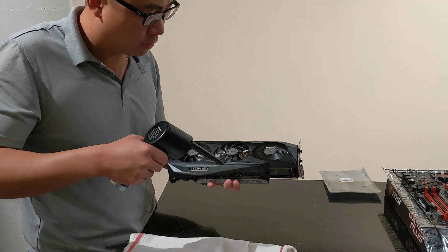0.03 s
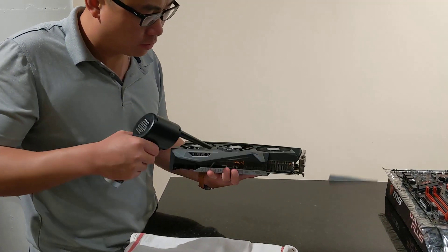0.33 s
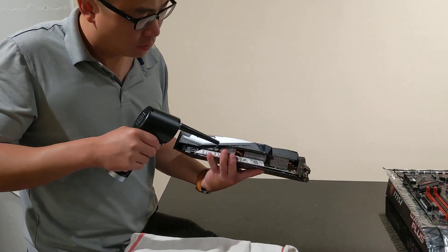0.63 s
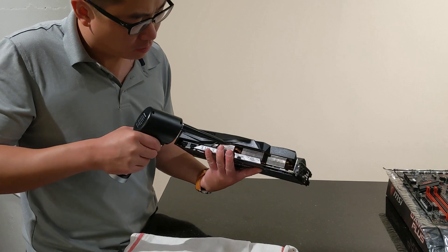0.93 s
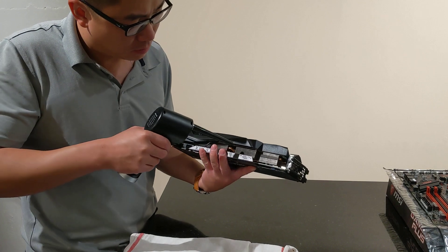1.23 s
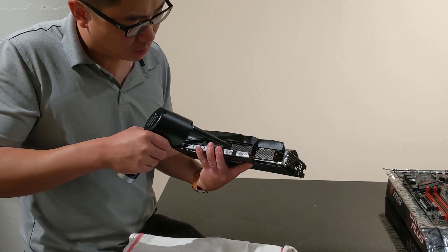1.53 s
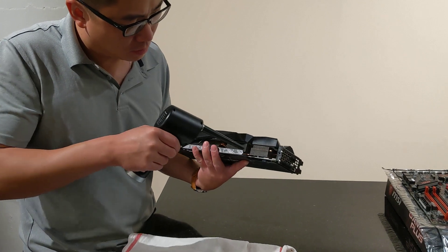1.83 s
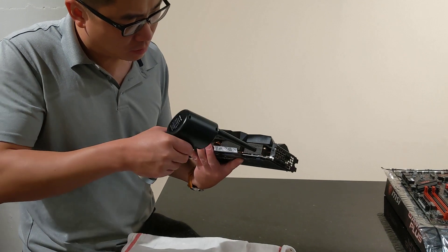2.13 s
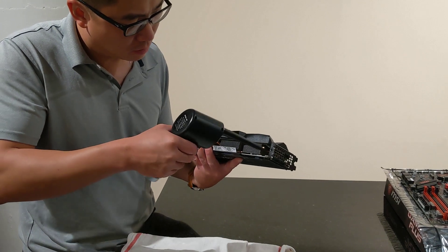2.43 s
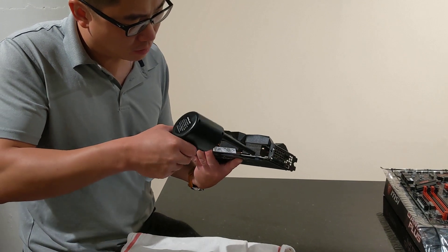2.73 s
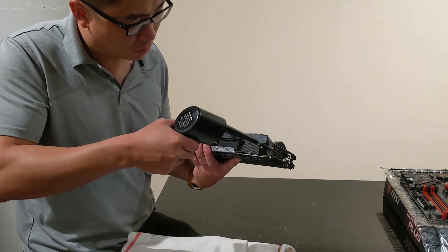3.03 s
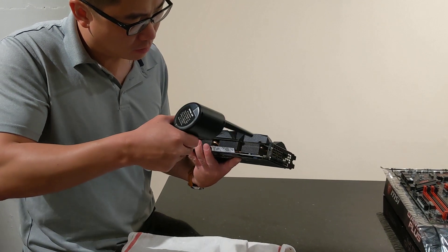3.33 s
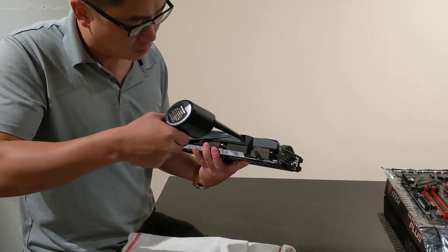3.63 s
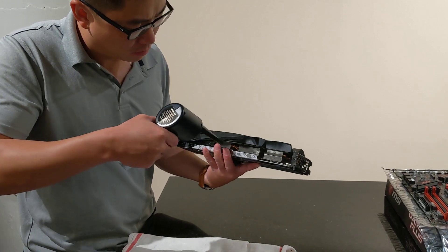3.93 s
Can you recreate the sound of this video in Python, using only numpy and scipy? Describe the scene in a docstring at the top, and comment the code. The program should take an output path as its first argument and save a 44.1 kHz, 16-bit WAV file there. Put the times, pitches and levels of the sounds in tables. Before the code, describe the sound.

An electric air duster blows a loud, hissing rush of air with a thin motor whine.

```python
"""A surging roar and hiss of air with a thin whine in it: a handheld electric duster at full speed,
blowing out a graphics card in a small room. The jet surges as the nozzle sweeps the card, and the
edges and gaps it crosses sing briefly as breathy whistles. The fan whines at its blade rate, with
weaker motor lines, over the steady low body of the air it draws."""
import sys
import numpy as np
from scipy import signal
from scipy.fft import rfft, irfft
from scipy.io import wavfile
from scipy.ndimage import uniform_filter1d

SR = 44100
rng = np.random.default_rng(int(sys.argv[2]) if len(sys.argv) > 2 else 0)


def master_out(mix):
    """Clip the mix to full scale and print it as 16-bit PCM to the path in sys.argv[1]."""
    frames = np.transpose(np.atleast_2d(mix))
    ceiling = np.clip(frames, -1, 1)
    pcm = np.round(ceiling * 32767).astype(np.int16)
    wavfile.write(sys.argv[1], SR, pcm)


N = 176400
FLUTTER_DB, FLUTTER_RATE = .5, 62  # turbulence: spread of the level, changes per second


def jet():
    """The jet strikes the card; turbulence makes all its layers flutter together."""
    air = low_roar() + roar() + hiss() + rush() + nozzle_resonance()
    return air * undb(FLUTTER_DB * walk(FLUTTER_RATE))


# Colour of the roar: f/Hz, level/dB
ROAR_SPECTRUM = [(400, -21), (900, -15.5), (1350, -6), (1750, -1), (2300, 0.5), (3000, -2), (4200, -11),
                 (6000, -11), (15500, -40)]
# Its surges: t/s, relative level/dB
ROAR_ENVELOPE = [(0.0, -34), (0.12, -27), (0.13, -30), (0.15, -27.5), (0.21, -25), (0.22, -30.5),
                 (0.28, -27.5), (0.68, -29.5), (0.71, -25), (0.76, -31), (0.93, -26.5), (0.97, -28.5),
                 (1.02, -25.5), (1.09, -31), (1.15, -29), (1.73, -34), (2.03, -30.5), (2.14, -36),
                 (2.16, -30), (2.56, -30.5), (2.6, -33.5), (2.67, -31.5), (2.9, -34.5), (2.99, -29),
                 (3.6, -34), (3.69, -29.5), (3.78, -29.5), (4.0, -30)]
def roar():
    """The midrange of the jet on the card, surging as the nozzle sweeps."""
    return noise(ROAR_SPECTRUM) * undb(curve(ROAR_ENVELOPE) - .5)


# Colour of the hiss: f/Hz, level/dB
HISS_SPECTRUM = [(2000, -23), (4500, 7), (6200, -8.5), (6800, 1), (7700, 4), (8200, -5), (9000, -12.5),
                 (9750, 8), (10300, 0.5), (10700, 5.5), (11200, -1.5), (11750, 7), (12300, 2.5),
                 (12900, -1), (15500, 0)]
# Its surges: t/s, relative level/dB
HISS_ENVELOPE = [(0.0, -35), (0.07, -40), (0.15, -32), (0.23, -39), (0.29, -33.5), (0.32, -37), (0.54, -34),
                 (0.58, -38.5), (0.82, -34.5), (0.86, -31), (0.93, -33.5), (1.79, -29.5), (1.89, -28.5),
                 (1.95, -31.5), (2.14, -28), (2.18, -31.5), (2.31, -31.5), (2.47, -26), (2.53, -31),
                 (2.58, -25.5), (2.62, -33), (2.64, -25.5), (2.7, -29), (2.73, -23.5), (2.86, -31),
                 (2.93, -28.5), (3.19, -35), (3.22, -29), (3.32, -29.5), (3.34, -29), (3.43, -34),
                 (3.48, -27), (3.55, -33), (3.59, -27), (3.72, -28.5), (3.78, -32), (3.9, -31.5),
                 (3.91, -30.5), (3.98, -29.5), (4.0, -31)]
def hiss():
    """The bright top of the jet on the card, with surges of its own."""
    return noise(HISS_SPECTRUM) * undb(curve(HISS_ENVELOPE) + 1.5)


# Colour of the rush: f/Hz, level/dB
RUSH_SPECTRUM = [(1200, -22.5), (2300, -6.5), (3300, 1), (3700, -0.5), (4100, 1.5), (4700, -12), (5100, -3),
                 (6500, -15), (9000, -5), (15500, -44)]
def rush(level_db=-30):
    """Upper-mid air that partly rides the surges of both hiss and roar."""
    hiss_db, roar_db = curve(HISS_ENVELOPE), curve(ROAR_ENVELOPE)
    ride_db = .69 * (hiss_db - hiss_db.mean()) + .42 * (roar_db - roar_db.mean())
    return noise(RUSH_SPECTRUM) * undb(level_db + ride_db)


# Swells of the airy resonance: t/s, relative level/dB
NOZZLE_ENVELOPE = [(0.0, -38), (0.17, -32), (0.24, -38), (0.28, -27.5), (0.33, -38.5), (0.4, -28.5),
                   (0.47, -35.5), (0.57, -35), (0.6, -40), (0.71, -34.5), (0.85, -40.5), (0.89, -25.5),
                   (1.08, -33.5), (1.34, -31), (1.46, -29), (1.89, -29), (1.98, -33.5), (2.03, -28.5),
                   (2.32, -32.5), (2.37, -27.5), (2.55, -30.5), (2.57, -27.5), (3.12, -32.5), (3.15, -29),
                   (3.24, -28.5), (3.3, -35), (3.31, -27), (3.42, -31), (3.64, -29.5), (3.84, -32.5),
                   (3.9, -26), (3.92, -36), (3.98, -25.5), (4.0, -35)]
def nozzle_resonance(trim_db=1, flutter_db=1.2, surge_s=.25):
    """The tool's own airy resonance flutters and lifts with the short surges of the hiss."""
    hiss_db = curve(HISS_ENVELOPE)
    surge_db = hiss_db - uniform_filter1d(hiss_db, int(surge_s * SR))
    level_db = curve(NOZZLE_ENVELOPE) + .27 * surge_db + flutter_db * walk(FLUTTER_RATE)
    return resonance(hz=5677, width_hz=910) * undb(level_db + trim_db)


# Colour of the low roar: f/Hz, level/dB
LOW_ROAR_SPECTRUM = [(200, -16), (400, -2.5), (620, -5), (850, -0.5), (1200, -0.5), (1500, -3),
                     (2200, -20.5), (5000, -35)]
# Its swells: t/s, relative level/dB
LOW_ROAR_ENVELOPE = [(0.0, -34.5), (0.26, -36), (0.33, -34), (0.41, -36), (1.12, -38.5), (1.36, -41.5),
                     (3.0, -39), (3.99, -40.5), (4.0, -60)]
def low_roar():
    """The weight under the roar, deepest when the jet blows into the card's fans."""
    return noise(LOW_ROAR_SPECTRUM) * undb(curve(LOW_ROAR_ENVELOPE) - 1)


# Whistle cues: start t/s, length/s, centre f/Hz, width/Hz, level/dB
EDGE_CROSSINGS = [(0.088, 0.078, 2560, 1200, -30.5), (.1, 0.096, 7400, 1200, -34.5),
                  (0.265, 0.038, 2480, 900, -28), (0.309, .05, 1390, 500, -31.5),
                  (0.308, .08, 840, 300, -38), (0.356, .05, 2200, 700, -24), (0.854, .07, 2100, 700, -33.5),
                  (.98, .08, 1590, 500, -37), (1.324, 0.073, 3530, 1000, -30),
                  (1.574, 0.36, 6950, 2010, -31.5), (1.58, 0.13, 9900, 900, -42),
                  (1.8, .11, 10700, 800, -36), (2.567, .03, 5750, 500, -26), (2.629, .025, 5770, 500, -24),
                  (3.128, 0.16, 3880, 1500, -26), (3.206, 0.063, 3860, 1200, -26),
                  (3.145, .055, 5140, 650, -20.5), (3.223, 0.098, 5200, 450, -26.5),
                  (3.315, 0.02, 5160, 600, -20.5), (3.296, 0.1, 3830, 1500, -30),
                  (3.551, 0.17, 3820, 1540, -24.5), (3.653, 0.092, 3380, 1410, -25),
                  (3.658, .025, 5100, 450, -25), (3.955, .07, 3070, 1800, -24)]
def edge_whistles(attack_s=.011, release_s=.02):
    """Breathy whistles that swell and die while the jet lies on an edge or a gap."""
    t, whistles = np.arange(N) / SR, 0
    for start, length, hz, width_hz, db in EDGE_CROSSINGS:
        fade_in = np.clip(.5 + (t - start) / attack_s, 0, 1)
        fade_out = np.clip(.5 + (start + length - t) / release_s, 0, 1)
        whistles += resonance(hz, width_hz) * fade_in * fade_out * undb(db)
    return whistles * undb(FLUTTER_DB * walk(FLUTTER_RATE))


# Swells of the whine: t/s, level/dB
WHINE_ENVELOPE = [(0, -46), (.2, -42), (.85, -41), (1.2, -35.5), (1.4, -62), (1.48, -27.5), (1.58, -24),
                  (1.72, -33), (2, -40), (2.3, -37), (2.6, -37), (2.76, -32), (2.95, -40), (3.1, -47),
                  (3.21, -24.5), (3.35, -33), (3.44, -38), (3.57, -30.5), (3.72, -32), (3.85, -52),
                  (4, -45)]
def blade_whine(clock, shaft_hz=584.7, blades=10):
    """The fan's thin whine, at the rate its blades pass."""
    return fading_tone(blades * shaft_hz * clock, curve(WHINE_ENVELOPE), pan_db=5, depth=.28)


# Motor and fan lines: f/Hz, level side-on/dB, level with intake to the front/dB, left minus right/dB
MOTOR_LINES = [(119, -56.5, -56.5, -0.5), (150.5, -54, -54.5, -2), (241.6, -54.5, -57, 5),
               (585, -57, -49.5, 2), (1172, -61, -44, 4), (1775, -43, -43, 4.5), (2960, -48, -57, -1),
               (3270, -50, -47, -3), (3875, -46, -52, -1), (11800, -52, -54, 4)]
def motor_lines(clock, turn_start_s=1.55, turn_end_s=2.5):
    """Weaker tones whose balance shifts as the tool turns its intake to the front."""
    lines = 0
    for hz, side_db, front_db, pan_db in MOTOR_LINES:
        level_db = curve([(turn_start_s, side_db), (turn_end_s, front_db)])
        lines += fading_tone(hz * clock, level_db, pan_db, depth=.26)
    return lines


# Colour of the intake air: f/Hz, level/dB
FAN_AIR_SPECTRUM = [(20, -34), (31, -23), (42, -7), (65, -7.5), (80, -13), (98, -11), (120, 1.5),
                    (155, -1.5), (200, -0.5), (260, -1), (380, -3), (520, -9.5), (650, -12), (950, -10),
                    (1400, -14.5), (2500, -7.5), (6000, -44), (15500, -49)]
def fan_air(level_db=-39):
    """The steady low body of air drawn through the fan."""
    return noise(FAN_AIR_SPECTRUM) * undb(level_db)


# Stereo width: f/Hz, side minus mid/dB
ROOM_WIDTH = [(30, -38), (70, -31), (110, -34), (160, -22), (350, -6), (600, -4), (1150, -10), (1700, -4.5),
              (2400, -2.5), (3100, -4), (4500, 0), (5600, -5), (6700, 1), (8100, -1.5), (10000, 1.5),
              (10700, 1), (12200, -5), (13000, 1), (15500, 0.5)]
# Stereo balance: f/Hz, left minus right/dB
ROOM_BALANCE = [(100, -0.5), (350, -1.5), (800, 2), (1700, 2), (2200, 1), (3300, 3.5), (4800, 1), (5800, 5),
                (6700, 1), (8000, 5), (9000, -7), (9900, 4.5), (10700, -6.5), (11300, -12), (11800, 6),
                (13000, 7.5), (15000, -2)]
def room(air, t60_s=.2, wet_share=.05):
    """Table and walls add a short tail; the air sounds narrow in the bass and wide in the treble."""
    t = np.arange(N) / SR
    tails = rng.standard_normal((2, N)) * undb(-60 * t / t60_s) * (t > .002)  # 2 ms pre-delay
    walls = rfft(tails / np.sqrt(np.sum(tails ** 2, axis=1, keepdims=True)))
    mid, side = rfft(air) * (np.sqrt(1 - wet_share) + np.sqrt(wet_share) * walls)
    side = side * over_bins(ROOM_WIDTH)
    lean = np.sqrt(over_bins(ROOM_BALANCE))
    return irfft(np.array([(mid + side) * lean, (mid - side) / lean]), N)


def undb(db):
    """Decibels to gain."""
    return 10 ** (np.asarray(db) / 20)


def unit(x):
    """Scale to rms 1."""
    return x / np.sqrt(np.mean(x ** 2))


def curve(rows):
    """Join (t/s, value) rows by straight lines."""
    return np.interp(np.arange(N) / SR, *np.array(rows, float).T)


def over_bins(rows):
    """Gain per frequency bin from (f/Hz, level/dB) rows."""
    hz, db = np.array(rows, float).T
    return undb(np.interp(np.log(np.fft.rfftfreq(N, 1 / SR) + 1), np.log(hz), db))


def noise(spectrum):
    """Two unrelated noises (mid, side) with the given colour, rms 1."""
    return unit(irfft(rfft(rng.standard_normal((2, N))) * over_bins(spectrum), N))


def resonance(hz, width_hz):
    """Turbulence (mid, side) through a steep resonance, rms 1."""
    f = np.fft.rfftfreq(N, 1 / SR) + 1
    detune = (f / hz - hz / f) * hz / width_hz
    return unit(irfft(rfft(rng.standard_normal((2, N))) / (1 + detune ** 2), N))


def walk(rate):
    """Smooth random drift of rms 1 that changes about rate times a second."""
    f = np.fft.rfftfreq(N, 1 / SR)
    smoothing = np.exp(-2 * (f / rate) ** 2) * (f > 0)
    return unit(irfft(rfft(rng.standard_normal(N)) * smoothing, N))


def fading_tone(cycles, db, pan_db, depth, fade_rate=22):
    """A sine that fades differently left and right as the tool moves."""
    fades = np.array([1 + depth * (walk(fade_rate) + 1j * walk(fade_rate)) for _ in range(2)])
    wave = (fades * np.exp(2j * np.pi * cycles)).real
    pan = undb(np.array([[pan_db], [-pan_db]]) / 2)
    return unit(wave) * undb(db) * pan


def scene():
    """The air in the room, with the whine and motor lines laid over it dry."""
    air = room(jet() + edge_whistles() + fan_air())
    clock = np.cumsum(1 + .000512 * walk(rate=4.5)) / SR  # all tones wander with the shaft's speed
    return air + blade_whine(clock) + motor_lines(clock)


def record(dry, top_hz=15650):
    """A steep low-pass cuts the very top."""
    return signal.sosfilt(signal.ellip(12, .1, 90, top_hz, fs=SR, output="sos"), dry)


dry = scene()
out = record(dry)
master_out(out)
```